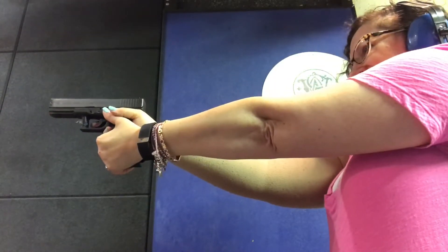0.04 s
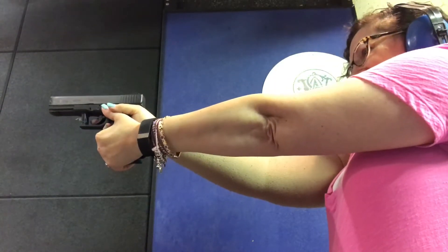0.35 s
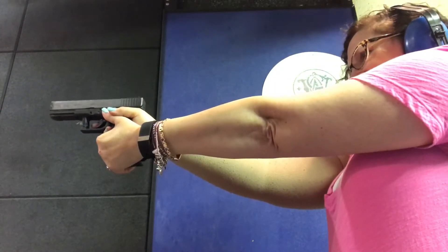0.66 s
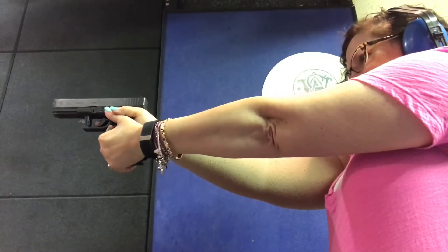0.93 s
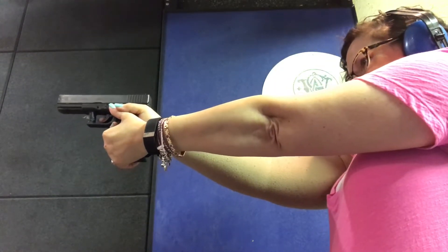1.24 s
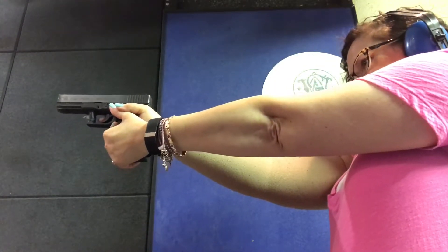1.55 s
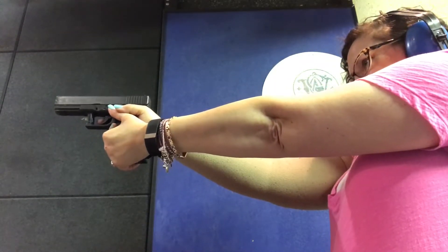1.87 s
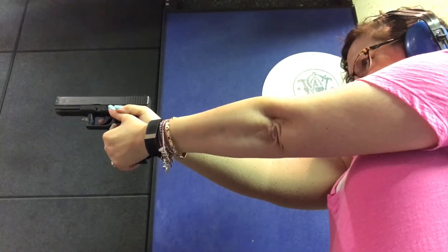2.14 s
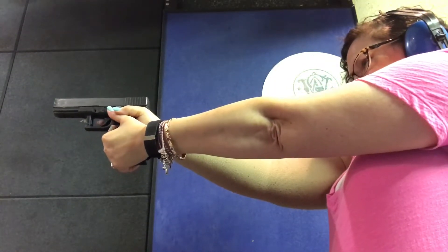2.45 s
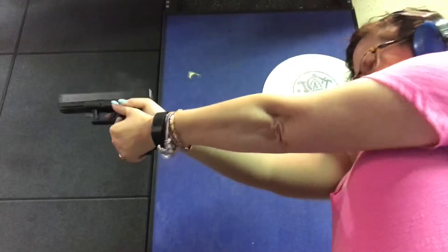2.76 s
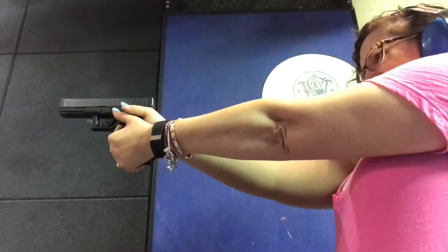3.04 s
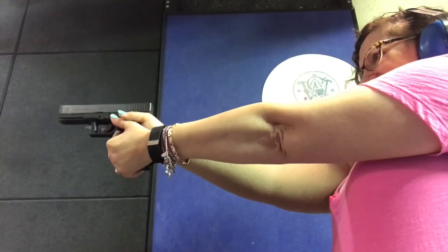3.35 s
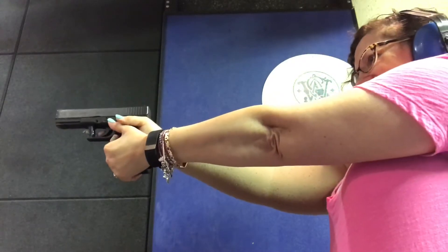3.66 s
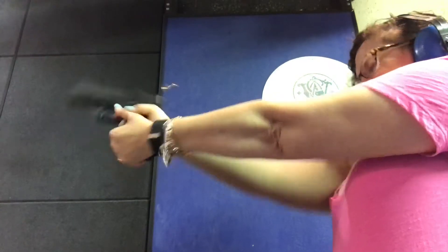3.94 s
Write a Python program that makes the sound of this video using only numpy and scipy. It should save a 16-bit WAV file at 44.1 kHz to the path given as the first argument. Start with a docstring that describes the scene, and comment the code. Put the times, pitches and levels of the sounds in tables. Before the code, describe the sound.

Two loud pistol shots ring out close by in an indoor shooting range.

```python
"""Two pistol shots, close by, in a lane of an indoor range. Each has a short, quieter lead-in, a muzzle
crack and a dense blast that rings the booth, then an echo from the far end. Spent brass pings on the
floor; trigger clicks, a clink, a double knock and dull bumps sound over rumbling ventilation and faint
microphone hiss. Gain control ducks at each shot and creeps back."""
import sys
import numpy as np
from scipy import signal
from scipy.fft import rfft, irfft, next_fast_len
from scipy.io import wavfile
from scipy.ndimage import uniform_filter1d, map_coordinates

SR = 44100
rng = np.random.default_rng(int(sys.argv[2]) if len(sys.argv) > 2 else 0)


def log_audio(samples):
    """Write samples as a 16-bit WAV file to the path given in sys.argv[1]."""
    # one column per channel
    frames = np.atleast_2d(samples).T
    # limit to full scale, then quantise
    limited = np.clip(frames, -1, 1)
    pcm = np.round(limited * 32767).astype(np.int16)
    wavfile.write(sys.argv[1], SR, pcm)


N = 176400

# lead_start_s, lead_db, blast_start_s, blast_db, hold_s, crack_over_blast_db, body_boost_db
SHOT_EVENTS = [(2.6526, -18.5, 2.6758, 11, 0.042, 5.5, 0), (3.8952, -18, 3.9168, 2, 0.057, 2, 4.5)]
# lead-in and crack spectra: freq_hz, level_db
LEAD_SPECTRUM = [(35, -42), (60, -9), (869, 0.5), (2780, -15), (3670, -12.5), (4320, -11.5), (4630, -15.5),
                 (6560, -20.5), (11700, -25.5), (15500, -27)]
CRACK_SPECTRUM = [(100, -10), (800, 0.5), (1700, -4.5), (4000, -3), (15000, -12.5)]
def pistol_shots():
    """Lead-in, muzzle crack and blast, then the range's reflections."""
    out = np.zeros(N)
    for lead_s, lead_db, start_s, blast_db, hold_s, crack_db, body_db in SHOT_EVENTS:
        gain = amp(blast_db)
        add(out, lead_s, amp(lead_db) * burst(LEAD_SPECTRUM, .09, attack_s=.00027, hold_s=.013))
        crack = burst(CRACK_SPECTRUM, .009, attack_s=.00049, hold_s=.0022)
        add(out, start_s, gain * amp(crack_db) * crack)
        add(out, start_s, gain * booth_blast(hold_s, body_db))
        add(out, start_s + .034, gain * wall_reflection())
        add(out, start_s + .098, gain * range_scatter())
        add(out, start_s + .213, gain * far_echo())
    return out


# blast spectrum: freq_hz, level_db
BLAST_SPECTRUM = [(30, -12.5), (50, -1.5), (110, -5.5), (300, -1), (430, -8), (620, -4), (1100, -7.5),
                  (1400, -10), (1900, -18), (3600, -16), (5500, -16), (10000, -21), (15500, -25.5)]
# blast decay: freq_hz, t60_s
BLAST_DECAY = [(60, 0.44), (250, 0.28), (900, 0.19), (2500, 0.18), (12000, 0.18)]
# booth resonances: pitch_hz, level_db
BOOTH_MODES = [(166, -3.5), (210, -3), (273, -1), (324, -4), (526, -7.3), (560, -4), (620, -2.5),
               (665, -3.5), (729, -11), (774, -9.5), (833, -7), (915, 0), (956, -7), (1048, -4)]
# body band: low_hz, high_hz
BODY_BAND = [160, 1210]
def booth_blast(hold_s, body_db):
    """Dense noise that rings the booth's modes; body_db lifts the low mids."""
    blast = burst(BLAST_SPECTRUM, BLAST_DECAY, attack_s=.002, hold_s=hold_s)
    mode_hz, mode_db = np.transpose(BOOTH_MODES)
    weights = amp(mode_db) / np.linalg.norm(amp(mode_db))
    for pitch_hz, weight in zip(mode_hz, weights):
        blast += amp(-6.5) * weight * ring(pitch_hz, t60_s=.2, attack_s=.002, hold_s=hold_s)
    body = signal.lfilter(*signal.butter(1, BODY_BAND, 'band', fs=SR), blast)
    return blast + (amp(body_db) - 1) * body


def wall_reflection():
    """Short, bright slap off a wall."""
    spectrum = [(300, -16.5), (2000, -5.5), (6000, -2), (15000, -11.5)]
    return amp(-4) * burst(spectrum, .06, attack_s=.002, hold_s=.0065)


def range_scatter():
    """Faint swell of sound scattered from down the range."""
    spectrum = [(100, 5), (1000, -1), (2500, -17), (7000, -12), (15000, -38)]
    return amp(-37) * burst(spectrum, .37, attack_s=.025, hold_s=.07)


# echo spectrum: freq_hz, level_db
ECHO_SPECTRUM = [(18, -33), (30, -12), (65, 0), (111, -6.5), (144, -1.5), (592, -19), (709, -20),
                 (1100, -17.5), (2140, -33), (4290, -36.5), (12300, -57), (14000, -58)]
# echo decay: freq_hz, t60_s
ECHO_DECAY = [(60, 0.98), (200, 0.58), (1000, 0.64), (3000, 0.5), (10000, 0.43)]
# hall resonances: pitch_hz, level_db, t60_s
HALL_MODES = [(50.4, -20.5, 1.02), (71.5, -21, 1.2), (152, -29.5, 0.99), (214, -31, 0.58), (343, -33, 1.0),
              (1080, -40, 0.65)]
def far_echo():
    """Dark return from the far end, with the hall's modes ringing."""
    echo = amp(-25) * burst(ECHO_SPECTRUM, ECHO_DECAY, attack_s=.013, hold_s=.055)
    for pitch_hz, level_db, t60_s in HALL_MODES:
        echo += amp(level_db - 8.5) * ring(pitch_hz, t60_s, attack_s=.0074, hold_s=.063)
    return echo


# floor contacts: start_s, pitch_hz, ring_db, t60_s, tick_db
CASING_HITS = [(0.014, 11300, -64.5, 0.98, -76), (.41, 11326, -72, 0.59, -92), (.58, 10620, -70.5, 1, -92),
               (.763, 10550, -46, 0.38, -61), (.85, 10660, -66, 0.98, -68), (.98, 10620, -63.5, 0.91, -85),
               (1.13, 10680, -66.5, 0.67, -85), (1.39, 10630, -72.5, 0.79, -90),
               (1.755, 10690, -63.5, 0.37, -82), (1.812, 8930, -67.5, 0.3, -78),
               (1.815, 11700, -77, 0.47, -90), (2.13, 10690, -84, 0.63, -90), (2.36, 10690, -80, .4, -91),
               (2.915, 14540, -49, .33, -72), (3.410, 11326, -51, 0.41, -38), (3.48, 11326, -55, .35, -54),
               (3.795, 11360, -52, 0.33, -49), (3.804, 11300, -40.5, 0.26, -54),
               (3.822, 11320, -36.5, 0.27, -67)]
# contact spectrum: freq_hz, level_db
TICK_SPECTRUM = [(200, -38), (2500, -20), (4500, -12.5), (5400, -0.5), (7000, -8.5), (11000, -13),
                 (15000, -19)]
def casings():
    """Each contact ticks and rings the brass tube, with a brief shimmer; tumbling wavers the ring."""
    waver_per_s, waver_db, drift_hz, spread = 31, 3.5, 11, .16
    out, t = np.zeros(N), np.arange(SR) / SR
    for start_s, pitch_hz, ring_db, t60_s, tick_db in CASING_HITS:
        phase = 2 * np.pi * np.cumsum(pitch_hz + drift_hz * wobble(waver_per_s, SR)) / SR
        gain = amp(ring_db + waver_db * wobble(waver_per_s, SR))
        tone = np.sqrt(2) * np.sin(phase) * rise(t, .0027) * decay(t, t60_s)
        add(out, start_s, gain * tone)
        shimmer = [(pitch_hz * (1 - 2 * spread), -24), (pitch_hz, 0), (pitch_hz * (1 + spread), -24)]
        add(out, start_s, amp(ring_db - 14) * burst(shimmer, .24, attack_s=.002, hold_s=.015))
        add(out, start_s, amp(tick_db) * burst(TICK_SPECTRUM, .17, attack_s=.002, hold_s=.013))
    return out


# knock spectrum: freq_hz, level_db
KNOCK_SPECTRUM = [(88, -65), (150, -44), (278, -7.5), (468, 6), (866, -1.5), (4540, -20.5), (9820, -51),
                  (11000, -36), (15000, -31)]
def double_knock():
    """Hard knock in the booth, its softer reflection off the floor just after and a room tail."""
    start_s, second_s, knock_db = 3.4643, .014, -23
    out = np.zeros(N)
    for hit_s, level_db in [(start_s, knock_db), (start_s + second_s, knock_db - 4.5)]:
        add(out, hit_s, amp(level_db) * burst(KNOCK_SPECTRUM, .034, attack_s=.0003, hold_s=.0043))
    room_decay = [(300, .17), (2000, .18), (12000, .11)]
    add(out, start_s, amp(knock_db - 6) * burst(KNOCK_SPECTRUM, room_decay, attack_s=.003, hold_s=.022))
    return out


# clicks and bumps: start_s, level_db
TRIGGER_CLICKS = [(2.54, -50), (2.575, -57.5)]
BUMP_HITS = [(.902, -40.5), (2.16, -49), (2.391, -41.5)]
# spectra: freq_hz, level_db
CLICK_SPECTRUM = [(500, -17), (3000, -6), (4600, 2), (9000, -6.5), (15000, -13)]
CLINK_SPECTRUM = [(2000, -30), (4400, -10), (5000, -2), (5700, -12), (9000, -21), (15000, -20)]
BUMP_SPECTRUM = [(40, -8), (120, 2), (240, 1.5), (380, 1), (600, -9), (1500, -42), (8000, -70)]
def handling():
    """Trigger clicks, one small metal clink and dull bumps."""
    out = np.zeros(N)
    for start_s, level_db in TRIGGER_CLICKS:
        add(out, start_s, amp(level_db) * burst(CLICK_SPECTRUM, .05, attack_s=.00037, hold_s=.0026))
    add(out, .847, amp(-61.5) * burst(CLINK_SPECTRUM, .18, attack_s=.002, hold_s=.02))
    for start_s, level_db in BUMP_HITS:
        add(out, start_s, amp(level_db) * burst(BUMP_SPECTRUM, .14, attack_s=.002, hold_s=.018))
    return out


# air spectrum: freq_hz, level_db
AIR_SPECTRUM = [(12, -43), (20, -11), (55, 3.5), (107, -11), (152, -1.5), (186, -8.5), (307, -12.5),
                (340, -14), (376, -14.5), (448, -19), (508, -15.5), (686, -19.5), (1050, -19), (1610, -23),
                (3870, -33), (8000, -46), (10400, -73.5), (17600, -120)]
# air envelope: time_s, level_db
AIR_ENVELOPE = [(0, -49), (.9, -45.5), (1.6, -45), (2.499, -44), (3.299, -47), (4, -44.5)]
def ventilation():
    """Low rush of air handling, drifting in level."""
    level_db = np.interp(np.arange(N) / SR, *np.transpose(AIR_ENVELOPE))
    return amp(level_db) * noise(AIR_SPECTRUM, N)


# hiss spectrum: freq_hz, level_db
HISS_SPECTRUM = [(3000, -9.5), (8000, -0.5), (12000, 2), (16000, -2)]
def microphone_hiss():
    """Faint, steady treble noise."""
    return amp(-74) * noise(HISS_SPECTRUM, N)


def amp(db):
    return 10 ** (np.asarray(db) / 20)


def rise(t, attack_s):
    return 1 - np.exp(-t / attack_s)


def decay(t, t60_s, hold_s=0):
    return amp(-60 * np.maximum(t - hold_s, 0) / t60_s)


def along(points, hz):
    """Interpolate (freq_hz, value) points on a log axis."""
    freq_hz, values = np.transpose(points)
    return np.interp(np.log(hz + 1), np.log(freq_hz + 1), values)


def noise(spectrum, size):
    """Unit-rms noise shaped by (freq_hz, level_db) points."""
    padded = next_fast_len(size + 8192)
    gain = amp(along(spectrum, np.fft.rfftfreq(padded, 1 / SR)))
    x = irfft(rfft(rng.standard_normal(size), padded) * gain, padded)[:size]
    return x / np.sqrt(np.mean(x ** 2) + 1e-20)


def add(out, start_s, x):
    """Mix x into out from start_s."""
    i = int(round(start_s * SR))
    out[i:i + len(x)] += x[:max(N - i, 0)]


def burst(spectrum, t60_s, attack_s, hold_s):
    """Noise that rises, holds and dies; t60_s is one time or (freq_hz, t60_s) points."""
    t = np.arange(2 * SR) / SR
    x = noise(spectrum, len(t))
    if np.ndim(t60_s) == 0:
        return x * rise(t, attack_s) * decay(t, t60_s, hold_s)
    hz, frame_s, bins = signal.stft(x, SR, nperseg=256)
    fade = decay(frame_s, along(t60_s, hz)[:, None], hold_s)
    return signal.istft(bins * fade, SR)[1][:len(t)] * rise(t, attack_s)


def ring(pitch_hz, t60_s, attack_s, hold_s):
    """One decaying mode, random phase."""
    t = np.arange(2 * SR) / SR
    tone = np.sqrt(2) * np.sin(2 * np.pi * (pitch_hz * t + rng.random()))
    return tone * rise(t, attack_s) * decay(t, t60_s, hold_s)


def wobble(knots_per_s, size):
    """Smooth random curve."""
    knots = rng.standard_normal(int(size * knots_per_s / SR) + 4)
    return map_coordinates(knots, [np.arange(size) * knots_per_s / SR])


def scene():
    """Mono mix."""
    return (pistol_shots() + casings() + double_knock() + handling() + ventilation()
            + microphone_hiss())[None]


def record(dry):
    """Low cut, treble-keyed gain control (fast duck, slow recovery), soft clip, band limit."""
    low_cut_hz, key_hz, top_hz = 34, 1502, 15850
    threshold_db, recover_db_per_s, ceiling = -16.5, 14, .85
    x = signal.sosfilt(signal.butter(3, low_cut_hz, 'high', fs=SR, output='sos'), dry[0])
    treble = signal.sosfilt(signal.butter(2, key_hz, 'high', fs=SR, output='sos'), x)
    power = np.abs(uniform_filter1d(treble ** 2, size=660, origin=290))
    excess_db = np.maximum(10 * np.log10(power + 1e-12) - threshold_db, 0)
    creep_db = recover_db_per_s * np.arange(N) / SR
    duck_db = np.maximum.accumulate(excess_db + creep_db) - creep_db
    x = x * amp(-uniform_filter1d(duck_db, size=60))
    x = x / (1 + (x / ceiling) ** 6) ** (1 / 6)
    return signal.sosfilt(signal.ellip(10, .1, 70, top_hz, fs=SR, output='sos'), x)[None]


dry = scene()
out = record(dry)
log_audio(out)
```